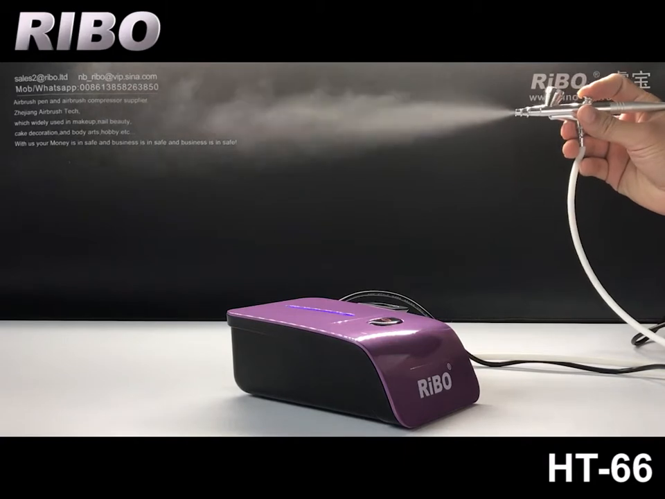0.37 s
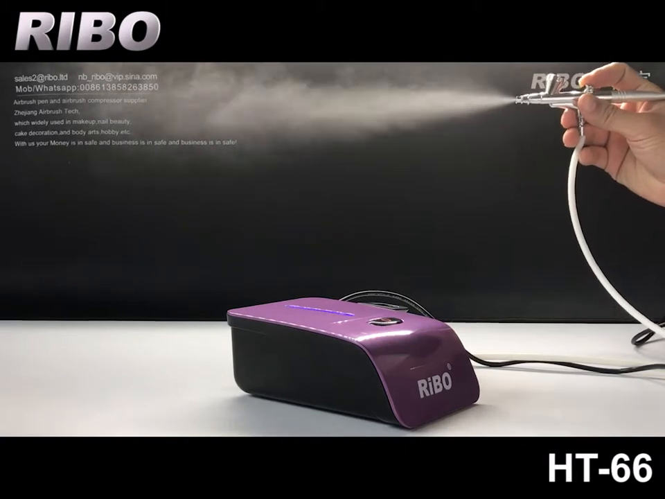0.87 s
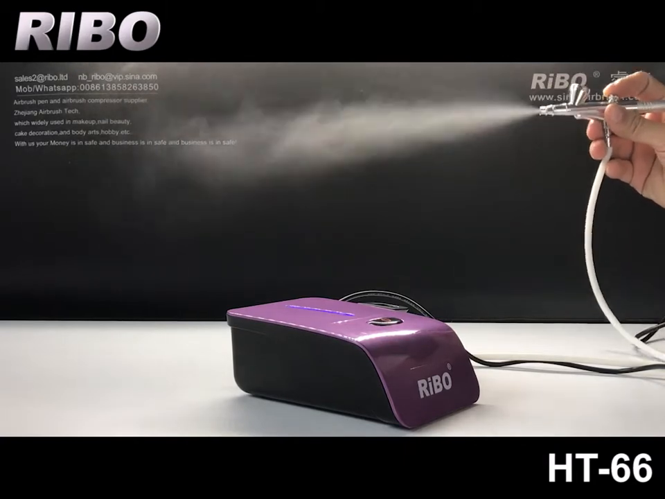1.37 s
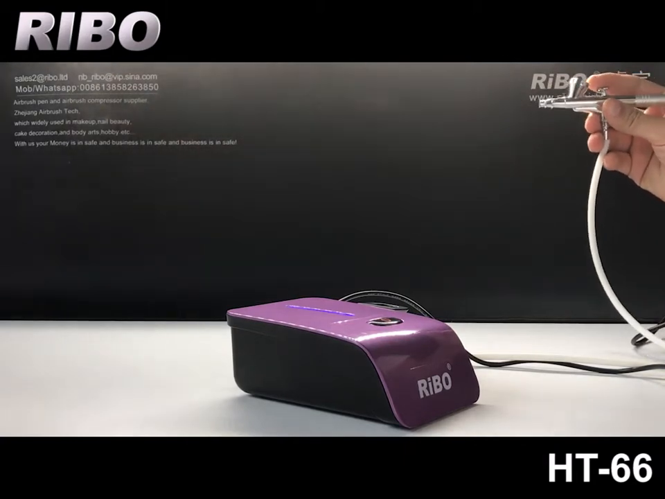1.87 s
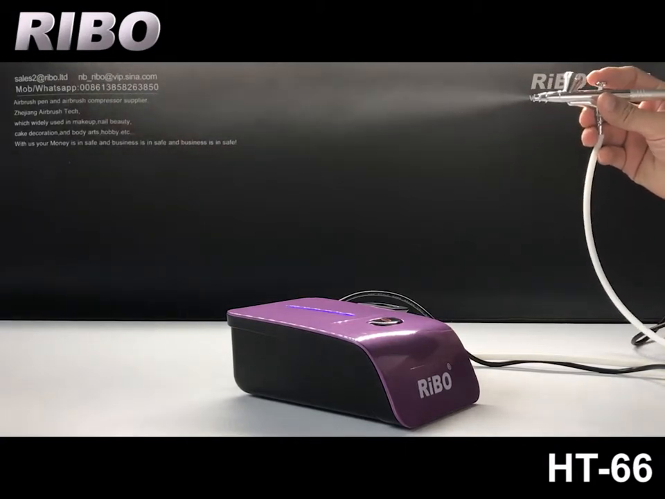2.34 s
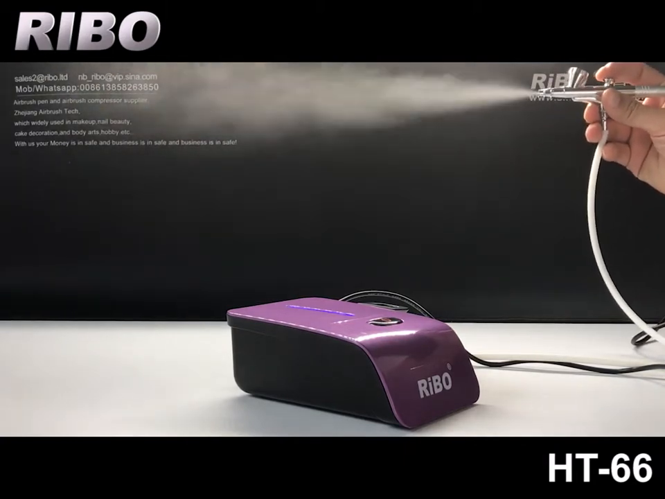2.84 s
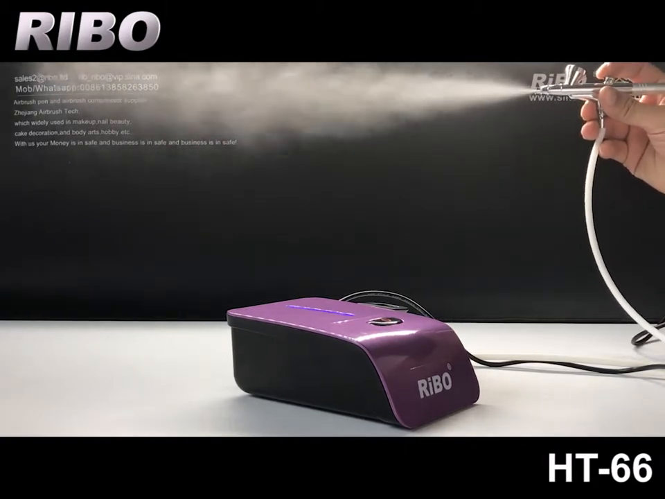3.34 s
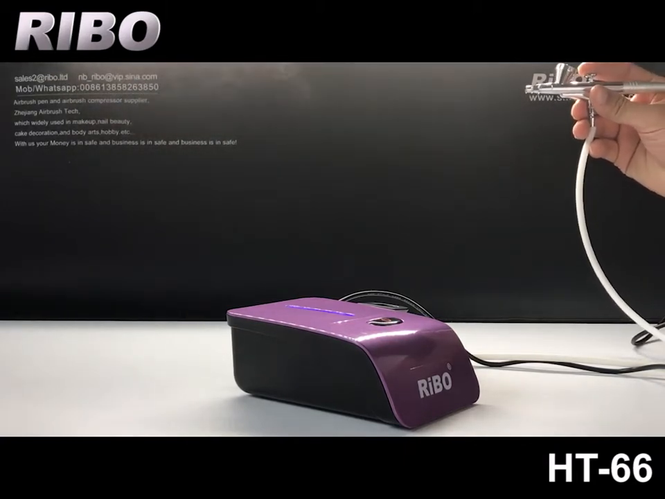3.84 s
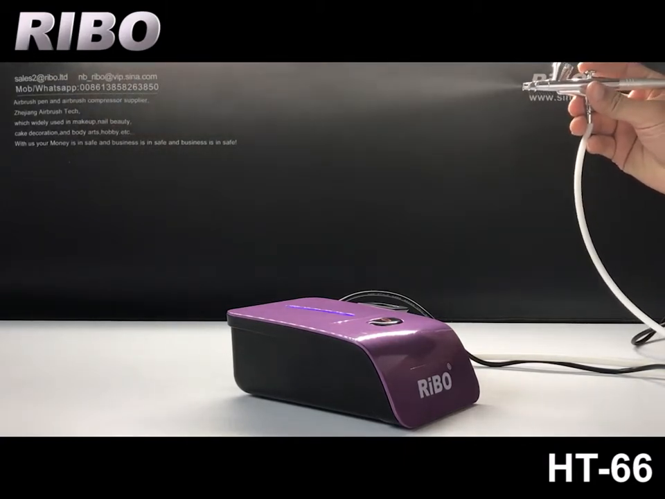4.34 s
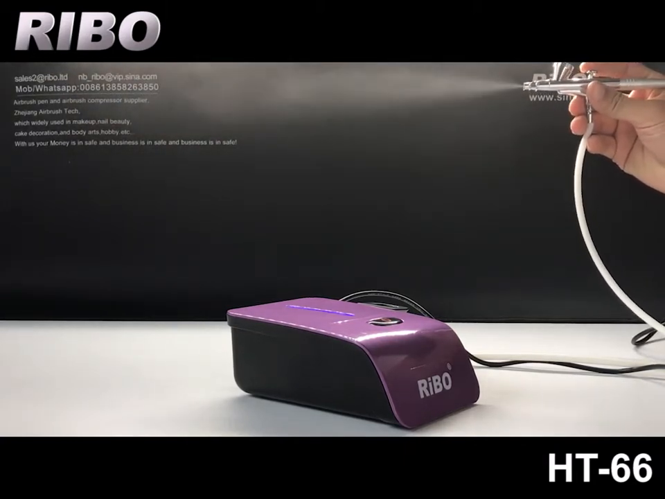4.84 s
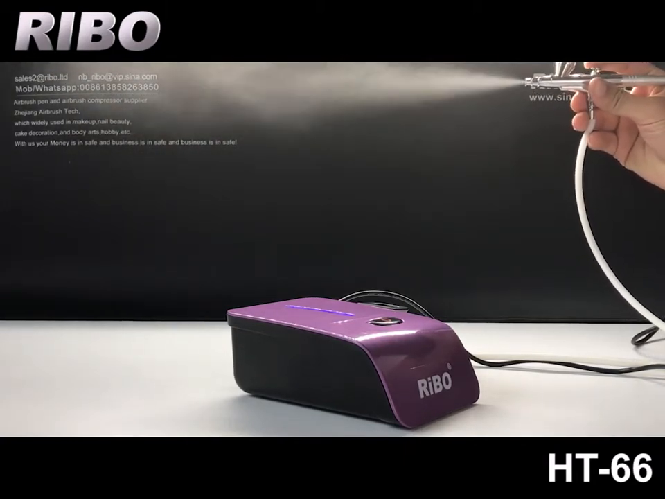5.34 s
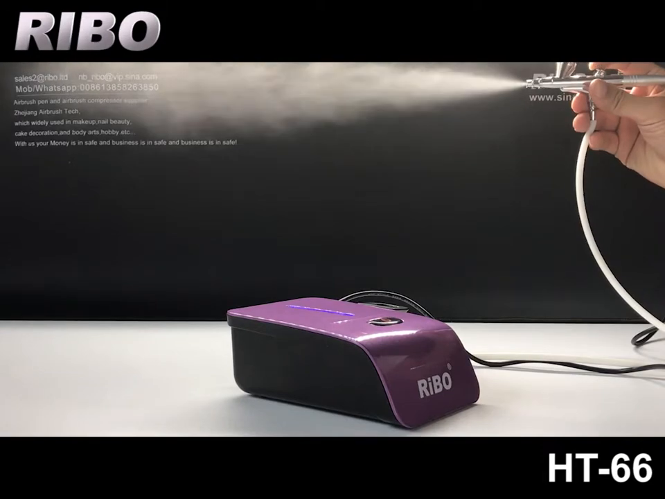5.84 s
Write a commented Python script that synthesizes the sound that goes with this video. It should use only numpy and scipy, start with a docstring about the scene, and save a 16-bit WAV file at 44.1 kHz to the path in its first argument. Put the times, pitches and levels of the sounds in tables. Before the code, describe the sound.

Steady buzzing pump motor in a small room, with sharp, airy spray hisses that cut off quickly and return in gradual steps.

```python
"""On a table in a small room, a piston compressor runs while an airbrush, held above it, sprays in long bursts.
The pump is a sum of overtones of its shaft's turn, with valve and casing noise that swells twice a turn.
The nozzle is four coloured noises, louder and fuller as the trigger opens, with faint resonant whistles.
A faint steady hum lies beneath; echoes follow the rattle and spray. One microphone feeds both channels."""
import sys
import numpy as np
from scipy import signal
from scipy.fft import rfft, irfft, next_fast_len
from scipy.io import wavfile

SR = 44100
rng = np.random.default_rng(int(sys.argv[2]) if len(sys.argv) > 2 else 0)


def store_wav(level_fs):
    """Save 16-bit WAV to argv[1]."""
    pcm = np.round(np.clip(np.atleast_2d(level_fs), -1, 1) * 32767)
    wavfile.write(sys.argv[1], SR, pcm.T.astype(np.int16))


def invert_db(x):
    """Field ratio 10**(x/20) for x, a level in decibels (scalar or array-like)."""
    u = np.asarray(x, float) / 20
    return 10 ** u


N = 273420  # samples

# shaft speed, creeping up: (start_s, speed_turns_per_s)
SHAFT_SPEED = [(0, 42.12), (1.2, 42.16), (2.0, 42.19), (2.8, 42.26), (3.6, 42.3), (4.4, 42.35),
               (6.2, 42.36)]


def rms_one(x):
    """Scale a signal to rms 1."""
    return x / np.sqrt(np.mean(x ** 2) + 1e-20)


def in_time(rows):
    """Draw straight lines between timed rows, one curve for each column after the time."""
    time_s, *columns = np.transpose(rows)
    return [np.interp(np.arange(N) / SR, time_s, column) for column in columns]


def drift(rate_hz):
    """Slow chance of rms 1: noise at every 40th sample through a double one-pole low-pass."""
    r = np.exp(-80 * np.pi * rate_hz / SR)
    noise = rng.standard_normal(N // 40 + 2002)
    slow = signal.lfilter([1], [1, -2 * r, r * r], noise)[2000:]   # drop the filter's run-in
    return np.interp(np.arange(N) / 40, np.arange(len(slow)), rms_one(slow))


def coloured_noise(spectrum):
    """White noise given a spectrum of (pitch_hz, level_db); rms 1."""
    size = next_fast_len(N)
    pitch_hz, level_db = np.transpose(spectrum)
    bins_hz = np.arange(size // 2 + 1) * SR / size
    shape_db = np.interp(np.log(bins_hz + 1), np.log(pitch_hz), level_db, -99, -99)
    white = rfft(rng.standard_normal(size))
    return rms_one(irfft(white * invert_db(shape_db), size)[:N])


def shaft():
    """Turns made so far, with hesitations and slight unevenness, and how far the speed has risen (0-1)."""
    # brief hesitations of the shaft: (centre_s, lost_turns, length_s)
    stumbles = [(.03, .02, .008), (.27, .02, .008), (.87, .016, .008), (1.97, .008, .01), (3.4, .008, .01),
                (4.72, .007, .01)]
    start_turn, unevenness_turns = 0.97, 0.0005
    t = np.arange(N) / SR
    (speed,) = in_time(SHAFT_SPEED)
    turns = start_turn + np.cumsum(speed) / SR + unevenness_turns * drift(5.3)
    for centre_s, lost_turns, length_s in stumbles:
        turns -= lost_turns * .5 * np.tanh((t - centre_s) / length_s)
    return turns, (speed - speed.min()) / np.ptp(speed)


def pump(turns, risen, waver_db, waver_db_per_order):
    """Overtones of the turn, phased by the knocks and by the resonance they ring; higher ones waver more."""
    # knocks in one turn, whose dB weigh only the phases: (place_turn, thump_db, casing_ring_db, whine_db, buzz_db)
    knocks = [(0.1899, -12.3, -30.0, 4.3, -20.4), (0.3484, 0.5, 5.0, -4.9, -2.2),
              (0.4987, -18.8, -30.0, 2.6, -1.9), (0.6883, -7.8, -0.6, -30.0, -8.1),
              (0.8492, -0.9, 2.4, -30.0, 3.8), (0.9935, -13.3, -15.2, 5.0, -13.2)]
    # thump, casing ring, whine and buzz: (lowest_multiple, resonance_hz, width_hz)
    parts = [(1, 250, 400), (14, 845, 100), (30, 1567, 40), (43, 2100, 150)]
    # overtones at low speed, before the common level, for multiples 1, 2, 3 and on: level_db
    orders_db = [-3, -9, -3, -9, -9, 0, -11, -11, -18, -8, -24, -11, -9, -16, -13, -26, -13, -8, -9, -4, -7,
                 -13, -13, -17, -28, -18, -16, -17, -31, -26, -27, -29, -27, -19, -15, -19, -18, -21, -30,
                 -20, -30, -28, -25, -30, -30, -25, -29, -24, -26, -26, -19]
    # overtones sliding onto or off a casing resonance as the speed rises: multiple: gained_db
    order_gains_db = {1: 1, 2: 1, 6: -1, 9: -7, 10: 3, 18: 2, 20: 1, 11: 7, 16: 3, 25: 3, 30: 3, 32: -3, 26:
                      3, 33: 4, 34: 2, 35: 2, 36: 5, 37: 10, 38: 4, 40: -3, 51: -3, 41: 3, 42: -6, 43: -5,
                      44: 3, 47: 4, 48: 4, 49: 4}
    # overtones that weaken at one moment: multiple: lost_db
    settled_losses_db = {28: 1, 34: 7, 35: 5}
    settles_s, settling_s = 4.2, 0.091
    common_slow_db, common_fast_db = -53.5, -54
    # the faint overtones above the table
    top_order, high_order_db, high_gain_db, high_scatter_db = 70, -33, 2, 4

    place, *strengths_db = np.transpose(knocks)
    high_db = high_order_db + high_scatter_db * rng.standard_normal(top_order - len(orders_db))
    settled = .5 + .5 * np.tanh((np.arange(N) / SR - settles_s) / settling_s)
    out = np.zeros(N)
    for k, slow_db in enumerate([*orders_db, *high_db], 1):
        part = sum(k >= round(lowest) for lowest, _, _ in parts) - 1
        _, resonance_hz, width_hz = parts[part]
        pitch_hz = k * SHAFT_SPEED[-1][1]
        knock_sum = np.sum(invert_db(strengths_db[part]) * np.exp(-2j * np.pi * k * place))
        # the casing's answer leads below the resonance and lags above it
        answer = 1j * pitch_hz / (resonance_hz ** 2 - pitch_hz ** 2 + 1j * pitch_hz * width_hz)
        phase = np.angle(knock_sum * answer)
        gained_db = order_gains_db.get(k, 0) if k <= len(orders_db) else high_gain_db
        level_db = slow_db + common_slow_db + risen * (gained_db + common_fast_db - common_slow_db)
        level_db -= settled_losses_db.get(k, 0) * settled
        level_db += (waver_db + waver_db_per_order * k) * drift(8.1)
        out += np.sqrt(2) * invert_db(level_db) * np.cos(2 * np.pi * k * turns + phase)
    return out


def hum():
    """Faint steady tones of the power supply, as plain sines."""
    # (pitch_hz, rms_level_db)
    tones = [(100, -72), (186, -75.5)]
    t = np.arange(N) / SR
    return sum(np.sqrt(2) * invert_db(level_db) * np.sin(2 * np.pi * pitch_hz * t) for pitch_hz, level_db in tones)


def throb(turns, place, depth_db, sharpness):
    """Gain that swells once each turn, at a place in the turn (0-1)."""
    return invert_db(depth_db * np.exp(sharpness * (np.cos(2 * np.pi * (turns - place)) - 1)))


def rattle(turns):
    """Noise from valves and casing, strongest on the two strokes of each turn."""
    # colour before the strokes shape it: (pitch_hz, relative_level_db per Hz)
    colour = [(12, -10), (30, -6), (60, 1.5), (120, -3), (250, -2), (500, -0.5), (850, -2.5), (1300, -10.5),
              (1550, -3.5), (1800, -11.5), (2100, -6), (2900, -6), (3250, -16), (4300, -4), (5000, -17),
              (7000, -15)]
    level_db = -58
    first_stroke = throb(turns, 0.44, depth_db=5.5, sharpness=1.9)
    second_stroke = throb(turns, 0.896, depth_db=4.5, sharpness=4.6)
    return invert_db(level_db) * rms_one(first_stroke * second_stroke * coloured_noise(colour))


def whistle(pitch_hz, width_hz):
    """Noise passed twice through one narrow resonance; rms 1."""
    r, w = np.exp(-np.pi * width_hz / SR), 2 * np.pi * pitch_hz / SR
    mode = [1, -2 * r * np.cos(w), r * r]
    return rms_one(signal.lfilter([1], np.convolve(mode, mode), rng.standard_normal(N)))


def airbrush(turns, flutter_db, own_db):
    """The flow sets four hisses; they flutter together, surge, and swell with each pressure pulse in the hose."""
    # trigger pulled in steps and let go quickly: (start_s, flow; 0 air leak only, 1 steady full spray)
    trigger = [(0, 1.56), (.16, 1.02), (.25, 1.05), (.85, 1), (1.655, 1.03), (1.71, .3), (1.78, 0),
               (2.14, 0), (2.2, 0.52), (2.56, 0.61), (2.66, 0.91), (2.82, 1.14), (3.03, 1.12), (3.1, 1.03),
               (3.56, 1.06), (3.63, 0.14), (3.75, 0), (4.12, 0.026), (4.22, 0.38), (4.4, 0.44), (4.7, .4),
               (4.82, 0.63), (5.12, 0.76), (5.2, 0.91), (5.4, 1.04), (5.68, 1.16), (5.84, 1.01),
               (6.2, 1.02)]
    # hiss levels before flutter and surges: (flow, spatter_db, mist_db, air_jet_db, nozzle_edge_db)
    hiss_by_flow = [(0, -74.5, -66.5, -61, -59), (.35, -68.5, -60.5, -57, -53.5),
                    (.55, -62, -58.5, -52.5, -49), (.8, -58.5, -57, -50.5, -49.5),
                    (1.0, -57.5, -50.5, -47.5, -47), (1.15, -57, -47.5, -46, -46)]
    # colours of the four hisses: (pitch_hz, relative_level_db per Hz)
    spatter_colour = [(1500, -20), (2600, -3), (3300, -8), (4300, 0.5), (5500, -1), (6300, 0), (7200, 2.5)]
    mist_colour = [(5200, -38), (6300, -6), (7500, -3.5), (8500, 0.9), (9500, -0.5), (11000, -17)]
    jet_colour = [(8000, -32), (9300, -6.5), (10300, 2.5), (11000, 0), (11800, -3), (12600, 0.5),
                  (13300, -12.5), (14500, 0)]
    edge_colour = [(11500, -14), (13000, 4.5), (14000, 3), (14800, 5), (15200, 0), (15600, 12), (15900, 4)]
    # short surges and one dip of the spray: (centre_s, gained_db, length_s)
    surges = [(1.103, 0.5, .04), (1.356, 1.5, .04), (1.615, 2, 0.037), (3.51, 2, 0.036), (4.28, -1.5, .03),
              (5.002, 0.5, .05)]
    # nozzle whistle, strongest in the second pull: (start_s, level_db against the nozzle edge)
    whistle_course = [(0, -22), (2.0, -20), (2.2, -5), (3.55, -4), (3.8, -14), (6.2, -14)]
    # fainter whistles that come and go: (pitch_hz, width_hz, level_db against the air jet)
    faint_whistles = [(8500, 260, -22), (10450, 180, -16.5), (12320, 200, -16), (13800, 230, -21),
                      (14500, 200, -12)]
    come_and_go_db = 3.5

    t = np.arange(N) / SR
    (flow,) = in_time(trigger)
    (whistle_db,) = in_time(whistle_course)
    together_db = flutter_db * drift(17)
    for centre_s, gained_db, length_s in surges:
        together_db += gained_db * np.exp(-((t - centre_s) / length_s) ** 2)
    flow_steps, *laws_db = np.transpose(hiss_by_flow)
    levels_db = [np.interp(flow, flow_steps, law_db) + together_db for law_db in laws_db]
    _, _, jet_db, edge_db = levels_db

    spray = np.zeros(N)
    for level_db, colour in zip(levels_db, (spatter_colour, mist_colour, jet_colour, edge_colour)):
        spray += invert_db(level_db + own_db * drift(6.5)) * coloured_noise(colour)
    spray += invert_db(edge_db + whistle_db) * whistle(14900, width_hz=290)
    for pitch_hz, width_hz, level_db in faint_whistles:
        wander_db = come_and_go_db * drift(1.5)
        spray += invert_db(jet_db + level_db + wander_db) * whistle(pitch_hz, width_hz)
    return spray * rms_one(throb(turns, 0.36, depth_db=1.5, sharpness=5.0))


def room(x, count):
    """Direct sound plus a dying cloud of echoes, which changes as the hand moves through count positions."""
    t60_s, echo_db = 0.14, -8.5   # echo level against the direct sound
    position = np.arange(N) / (N - 1) * (count - 1)
    tail_s = np.arange(round(.4 * SR)) / SR
    out = x.copy()
    for k in range(count):
        here = np.cos(np.pi / 2 * np.clip(position - k, -1, 1))   # crossfade between neighbours
        decay = invert_db(-60 * tail_s / t60_s) * (tail_s > .002)
        echoes = rms_one(rng.standard_normal(len(tail_s)) * decay)
        span = slice(max(0, (k - 1) * N // (count - 1)), (k + 1) * N // (count - 1))
        wet = signal.fftconvolve((here * x)[span], echoes * invert_db(echo_db) / np.sqrt(len(tail_s)))
        out[span.start:span.start + len(wet)] += wet[:N - span.start]
    return out / np.sqrt(1 + invert_db(2 * echo_db))   # offsets the power the echoes add


def scene():
    """Pump and hum are heard dry; rattle and spray are heard in the room."""
    turns, risen = shaft()
    mono = pump(turns, risen, waver_db=0.44, waver_db_per_order=0.0058) + hum()
    mono += room(rattle(turns) + airbrush(turns, flutter_db=0.34, own_db=0.58), count=12)
    return np.stack([mono, mono])


def roll_off(x):
    """The treble ends steeply here."""
    return signal.sosfilt(signal.butter(12, 17010, fs=SR, output="sos"), x)


def record(dry):
    """A steep elliptic low-pass cuts the top of the microphone's signal."""
    low_pass = signal.ellip(14, .3, 70, 15740, fs=SR, output="sos")   # order, ripple dB, stop dB, cutoff Hz
    mix = signal.sosfilt(low_pass, dry)
    return roll_off(mix)


dry = scene()
out = record(dry)
store_wav(out)
```